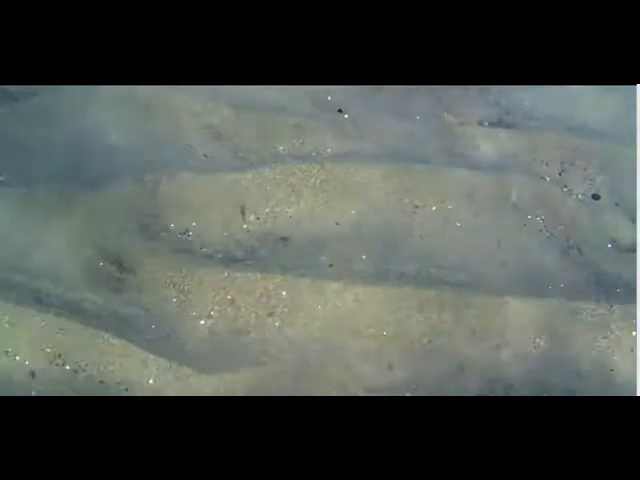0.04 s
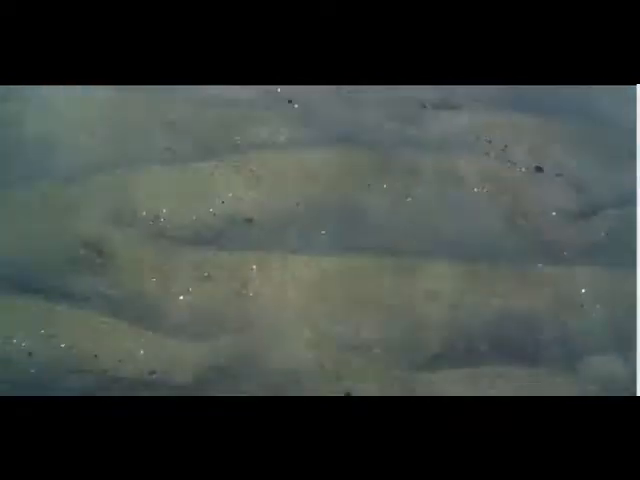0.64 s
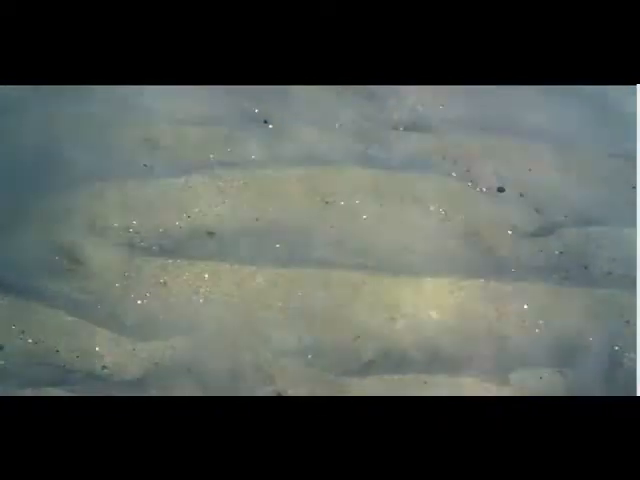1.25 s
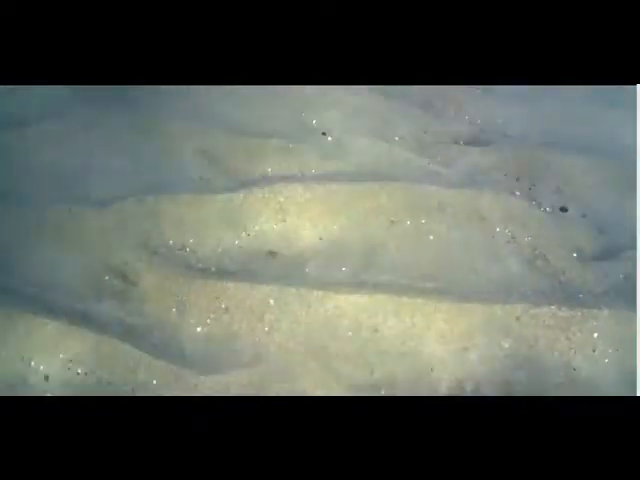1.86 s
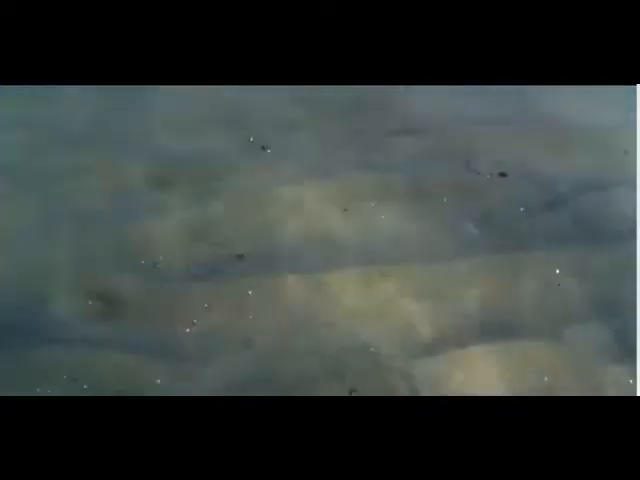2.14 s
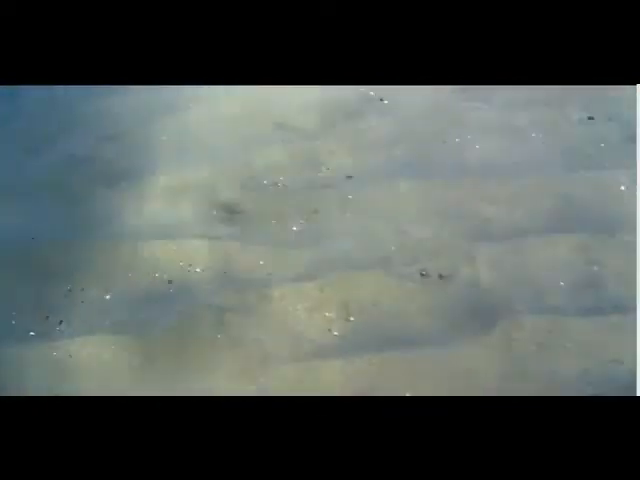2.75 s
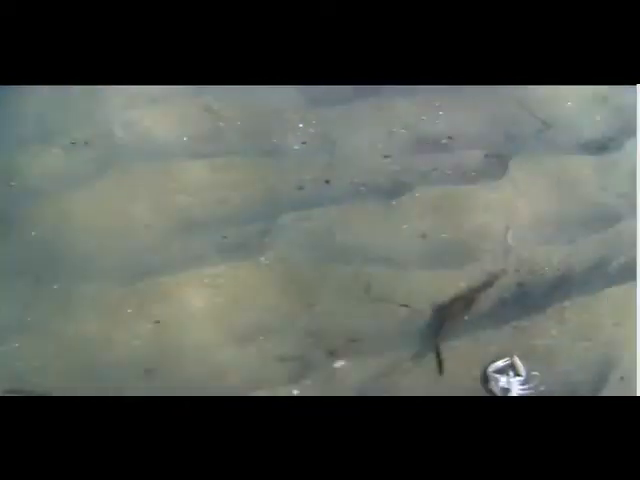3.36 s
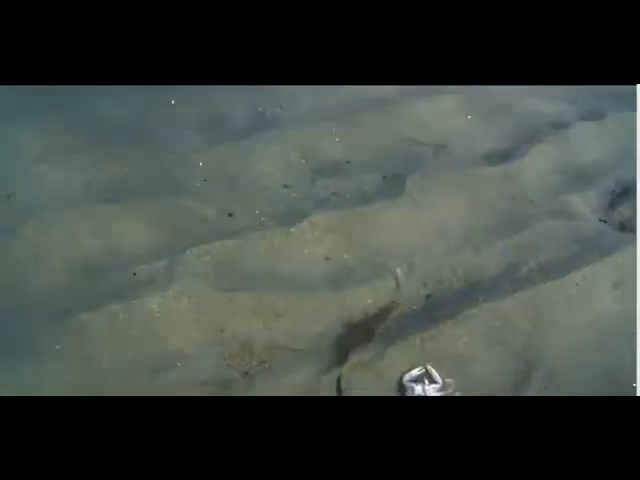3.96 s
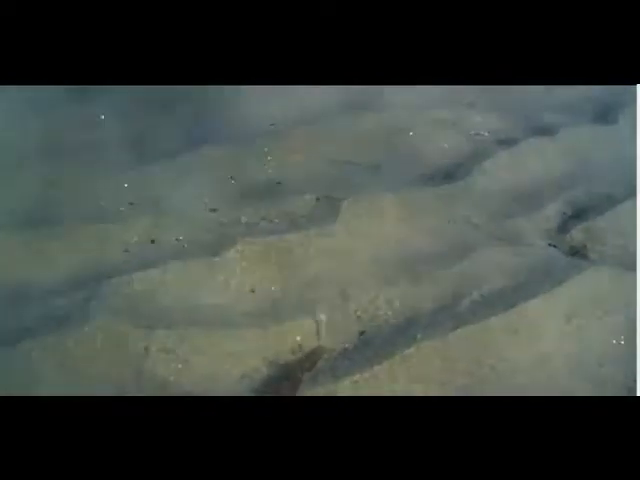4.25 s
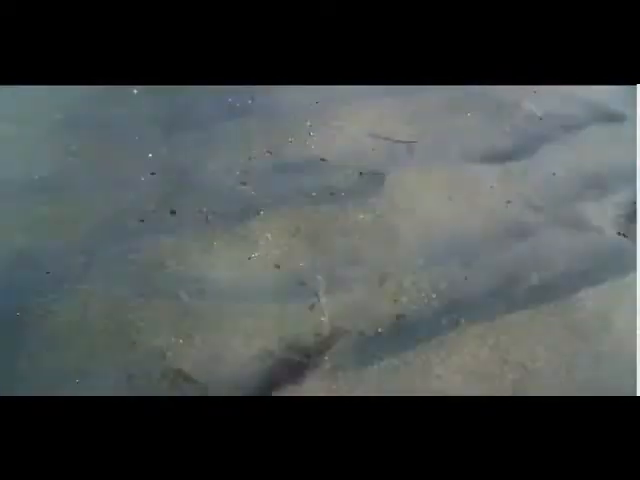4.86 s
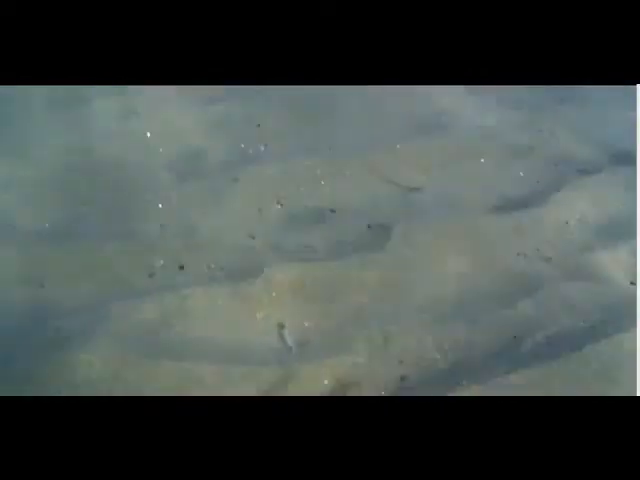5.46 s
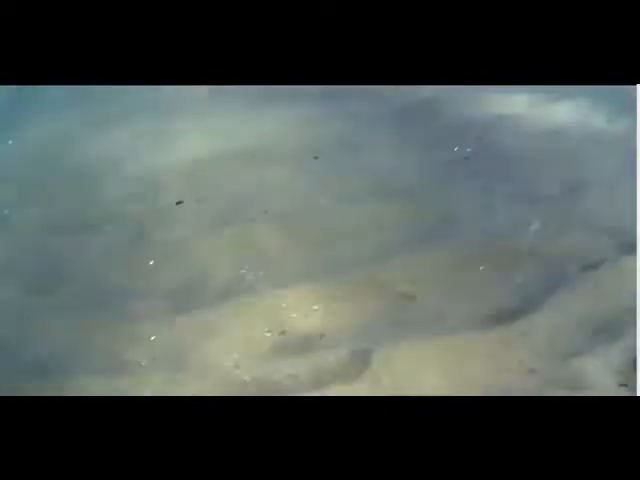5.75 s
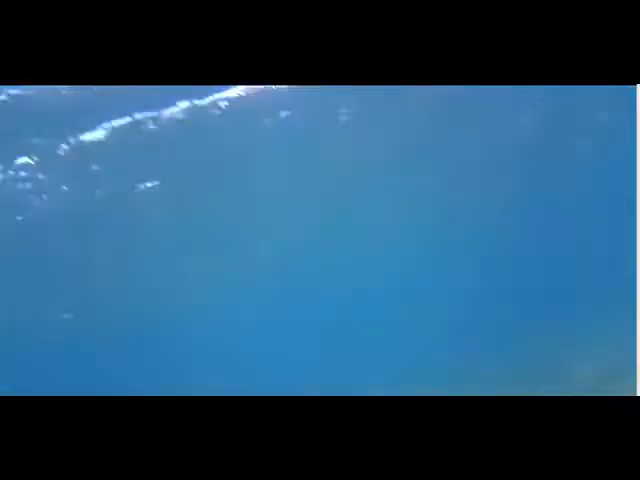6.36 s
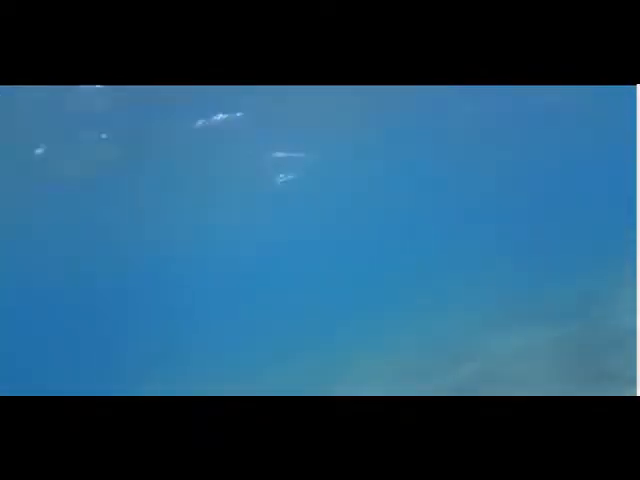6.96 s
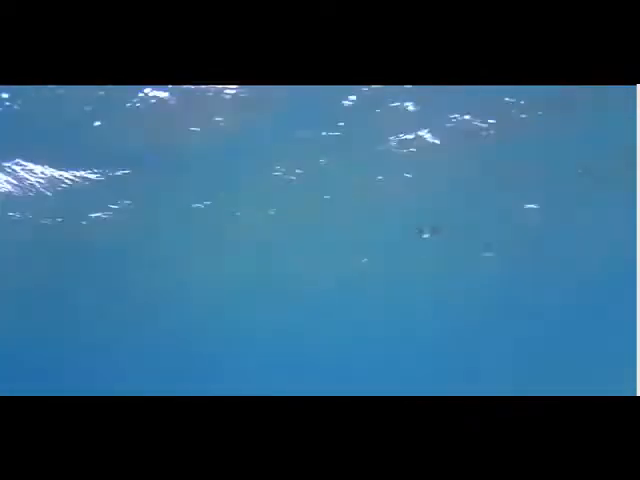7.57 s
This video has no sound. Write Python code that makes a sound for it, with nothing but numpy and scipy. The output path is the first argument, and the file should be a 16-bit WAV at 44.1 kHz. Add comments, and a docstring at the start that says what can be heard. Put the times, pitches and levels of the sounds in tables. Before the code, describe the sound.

A plastic camera case is handled underwater, giving short ringing clicks and scrapes over soft water movement, small bubbles and faint rumble.

```python
"""Knocks and finger slips on a plastic camera housing, handled under water over a shallow sandy bed.
Each contact rings the shell briefly at one strong pitch and thuds its damped wall.
Hand moves rub the shell and stir the water; a few bubbles ping.
A faint low throb, probably the camera's own works, runs underneath."""
import sys
import numpy as np
from scipy import signal
from scipy.fft import rfft, irfft, next_fast_len
from scipy.io import wavfile
from scipy.ndimage import uniform_filter1d, map_coordinates

SR = 44100
rng = np.random.default_rng(int(sys.argv[2]) if len(sys.argv) > 2 else 0)


def store_pcm(level_fs):
    """Save levels as 16-bit WAV."""
    pcm = np.round(np.clip(level_fs, -1, 1) * 32767).astype(np.int16)
    wavfile.write(sys.argv[1], SR, np.atleast_2d(pcm).T)


N = 336042
STILL_WATER_DB, STILL_GRIP_DB = -84, -82


def amp(db):
    """dB to gain."""
    return 10 ** (np.asarray(db) / 20)


def unit(x):
    """x at rms 1."""
    return x / np.sqrt(np.mean(x ** 2) + 1e-20)


def unit_peak(hits):
    """Each row at rms 1 over its loudest 3 ms."""
    power = uniform_filter1d(hits ** 2, size=132, axis=-1)
    return hits / np.sqrt(power.max(axis=-1, keepdims=True) + 1e-20)


def wobble(knots_per_s):
    """Smooth random curve."""
    knots = rng.standard_normal(int(N * knots_per_s / SR) + 4)
    return map_coordinates(knots, [np.arange(N) * knots_per_s / SR])


def filtered(x, response):
    """x through a complex frequency response."""
    n = x.shape[-1]
    size = next_fast_len(n + min(n, SR))
    return irfft(rfft(x, size) * response(np.fft.rfftfreq(size, 1 / SR)), size)[..., :n]


def coloured(x, spectrum):
    """x shaped by (frequency [Hz], level [dB]) points, at rms 1."""
    hz, db = np.transpose(spectrum)
    return unit(filtered(x, lambda f: amp(np.interp(np.log(f + 1), np.log(hz), db))))


def softened(force, corner_hz):
    """Soft contact: force spread in time, treble lost."""
    return filtered(force, lambda f: 1 / (1 + 1j * f / corner_hz))


def resonate(x, modes, skirt=0.11):
    """x through damped modes with steep skirts."""
    size = 8192
    f = np.fft.rfftfreq(size, 1 / SR) + 1
    power = 0
    for hz, width_hz, db in modes:
        peak = amp(2 * db) / (1 + (2 * (f - hz) / width_hz) ** 2)
        skirt_hz = width_hz + skirt * np.sqrt(hz * 2000)
        power += peak / (1 + ((f - hz) / skirt_hz) ** 4)
    # minimum phase: the ring follows the blow
    cepstrum = irfft(np.log(power + 1e-8) / 2)
    cepstrum[1:size // 2] *= 2
    cepstrum[size // 2 + 1:] = 0
    ring = irfft(np.exp(rfft(cepstrum)))[:size // 4]
    rung = signal.fftconvolve(np.atleast_2d(x), ring[None], axes=1)
    return rung[:, :x.shape[-1]].reshape(x.shape)


# hand moves: (time [s], 20 dB fade time [s], water level [dB], grip level [dB])
HAND_MOVES = [(.33, .25, -79, -82), (.72, .5, -96, -75), (2.16, 1.0, -71.5, -65.5), (2.6, 0.65, -70.5, -60),
              (3.5, 0.43, -72, -57), (4.33, 0.74, -70, -60.5), (5.76, 0.93, -65, -60.5),
              (6.14, 0.4, -63.5, -46), (6.45, 0.32, -56, -37.5), (6.64, .21, -55.5, -41),
              (7.0, 2, -75, -60.5)]


def stirring(peaks_db, rest_db, onset_db_per_s=230):
    """Level in dB per sample: each move builds fast, then fades to rest."""
    t = np.arange(N) / SR
    power = amp(2 * rest_db)
    for (s, fade_s, *_), db in zip(HAND_MOVES, peaks_db):
        fall_db = np.maximum(onset_db_per_s * (s - t), 20 * (t - s) / fade_s)
        power = power + amp(2 * (db - fall_db))
    return 10 * np.log10(power)


# throb pulse spectrum: (frequency [Hz], relative density [dB])
PULSE_SPECTRUM = [(10, -21.5), (24, -2.5), (48, -3), (72, -11), (105, -13), (150, -22.5), (300, -39.5),
                  (800, -90.5)]
# rumble spectrum: (frequency [Hz], relative density [dB])
RUMBLE_SPECTRUM = [(12, -15.5), (35, -2), (70, -1.5), (108, 2.5), (150, -9.5), (240, -10.5), (320, -31.5),
                   (600, -43), (1500, -84)]


def throb(flow_db, rate_hz=24, jitter_s=0.0034, surge_db=3.5, drift_db=1,
          base_db=-62.5, pulse_db=-1, rumble_db=-3, max_swell_db=5, knee_db=10):
    """Soft, even pulses in a rumble that surges with each; both swell as the housing moves."""
    beats_s = np.arange(0, N / SR, 1 / rate_hz)
    beats_s += jitter_s * rng.standard_normal(len(beats_s))
    pulses = np.bincount(np.clip(beats_s * SR, 0, N - 1).astype(int), minlength=N)
    beat = amp(pulse_db) * coloured(pulses.mean() - pulses, PULSE_SPECTRUM)
    cycle = np.cos(2 * np.pi * rate_hz * np.arange(N) / SR)
    rumble_gain = amp(rumble_db + surge_db * cycle + drift_db * wobble(3.7))
    rumble = rumble_gain * coloured(rng.standard_normal(N), RUMBLE_SPECTRUM)
    swell_db = max_swell_db * np.tanh((flow_db - STILL_WATER_DB) / knee_db)
    return (beat + rumble) * amp(base_db + swell_db)


# swirl spectrum: (frequency [Hz], relative density [dB])
WATER_SPECTRUM = [(100, -21), (250, -0.5), (480, 5), (700, -4), (900, -13.5), (1200, -3.5), (1700, -14.5),
                  (2400, -2.5), (3000, -10.5), (3800, -28), (6000, -30), (10000, -36), (11500, -61.5)]


def water(flow_db, patchy_db=3.0, trim_db=1):
    """Dull swirl around the moving housing, patchy in pitch and time."""
    noise = signal.stft(rng.standard_normal(N), nperseg=512)[2]
    patches = uniform_filter1d(rng.standard_normal(noise.shape), size=4, axis=0)
    patches = uniform_filter1d(patches, size=6, axis=1)
    swirl = signal.istft(noise * amp(patchy_db * unit(patches)), nperseg=512)[1][:N]
    return coloured(swirl, WATER_SPECTRUM) * amp(flow_db + trim_db)


# main shell modes, strongest last: (frequency [Hz], width [Hz], relative level [dB])
MAIN_MODES = [(1640, 140, -14), (1778, 130, 0)]
# weaker shell modes: (frequency [Hz], width [Hz], relative level [dB])
WEAK_MODES = [(1124, 52, -20.5), (2230, 120, -30.5), (2360, 160, -22), (3120, 340, -42.5), (4590, 630, -52),
              (5658, 100, -23.5), (6082, 180, -32.5), (7030, 730, -46.5), (8660, 1000, -49),
              (9630, 140, -27), (9994, 130, -33)]


def shell(force):
    """Brief ring of the plastic shell under a force."""
    return resonate(force, MAIN_MODES + WEAK_MODES)


def friction(slips_per_s, drag, spread_db=3.5):
    """Force at rms 1: tiny uneven slips over a steady noisy drag."""
    slips = (rng.random(N) < slips_per_s / SR) * amp(spread_db * rng.standard_normal(N))
    return unit(unit(slips) + drag * rng.standard_normal(N))


def rubbing(grip_db, flutter_db=3.8, trim_db=-3.2, soft_hz=2600):
    """Soft skin creeps over the shell."""
    creep = softened(friction(slips_per_s=300, drag=0.6), soft_hz)
    return unit(shell(creep)) * amp(grip_db + trim_db + flutter_db * wobble(38))


def grip_crackle(grip_db, ticks_per_s=24, spread_db=3.0, cluster_db=2.5, trim_db=-5, soft_hz=6000):
    """The shifting grip ticks on the shell in faint clusters, as strong as the hand's movement."""
    ticks = rng.random(N) < ticks_per_s / SR
    tick_db = spread_db * np.clip(rng.standard_normal(N), -2, 2) + cluster_db * wobble(7)
    force = softened(ticks * amp(tick_db), soft_hz)
    return unit(shell(force)) * amp(grip_db + trim_db)


def fizz(flow_db, count=260, centre_hz=1600, decay_cycles=16, spread_db=4):
    """Tiny bubbles of mixed sizes ping, louder in stirred water."""
    track, t = np.zeros(N), np.arange(SR // 20) / SR
    times_s = rng.random(count) * N / SR
    scatter = np.clip(rng.standard_normal((count, 2)), -2, 2)
    for s, (pitch, strength) in zip(times_s, scatter):
        hz = centre_hz * 2 ** (pitch / 2)
        db = flow_db[int(s * SR)] + spread_db * strength
        envelope = np.exp(-hz * t / decay_cycles) * (1 - np.exp(-hz * t))
        add(track, s, amp(db) * envelope * np.sin(2 * np.pi * hz * t))
    return track


def add(track, s, sound):
    """Mix sound into track at s seconds."""
    part = track[max(round(s * SR), 0):][:len(sound)]
    part += sound[:len(part)]


# low wall modes: (frequency [Hz], width [Hz], relative level [dB])
WALL_MODES = [(148, 60, -9), (241, 96, -0.5), (432, 70, 1.5), (498, 130, 2.5), (670, 100, -21.5),
              (870, 350, -6)]


def wall(force):
    """Damped thud of the housing wall under a force."""
    return resonate(force, WALL_MODES)


def knock_force(hardness_db, chatter=0.095, chatter_s=0.0021, settle=0.014, settle_s=0.012,
                bounces=4, rebound=0.75, soft_hz=4000):
    """One row per contact: snap, chatter and rebounds; harder blows are brighter and rebound more."""
    count, t = len(hardness_db), np.arange(SR // 16) / SR
    envelope = chatter * np.exp(-t / chatter_s) + settle * np.exp(-t / settle_s)
    force = rng.standard_normal((count, len(t))) * envelope
    force[:, 0] += 1
    # the main mode throws the contact off and catches it 1-3 cycles later
    shape = (count, bounces)
    cycles = np.cumsum(rng.integers(1, 4, shape), axis=1) + 0.07 * rng.standard_normal(shape)
    landings = np.round(cycles / MAIN_MODES[-1][0] * SR).astype(int)
    retained = np.clip(0.58 + 0.009 * hardness_db, 0, 1) ** np.arange(bounces)
    force[np.arange(count)[:, None], landings] += rebound * retained * rng.uniform(0.28, 1, shape)
    return softened(force, soft_hz * amp(0.24 * hardness_db))


# finger knocks: (time [s], ring level [dB])
FINGER_KNOCKS = [(0.218, -64), (0.33, -59), (0.352, -61), (0.4745, -54), (2.0852, -17), (2.1075, -24),
                 (2.1125, -23), (2.2065, -25), (2.269, -35), (2.46, -31), (2.4915, -38), (2.51, -32),
                 (2.5452, -15), (2.62, -46), (2.7195, -38), (3.3425, -35), (3.348, -33), (3.3795, -41),
                 (3.4688, -40), (3.546, -41), (3.643, -44), (4.2092, -12), (4.2235, -30), (4.261, -31),
                 (4.2912, -29), (4.823, -56), (5.59, -62), (5.655, -70), (5.7105, -52), (5.7553, -13),
                 (5.7612, -17), (5.806, -38), (5.833, -37), (5.856, -25), (6.0333, -8.5), (6.049, -23),
                 (6.0695, -25), (6.1545, -24), (6.168, -24), (6.2102, -15), (6.2448, -33), (6.3147, -44),
                 (6.3655, -34), (6.4277, -17), (6.4325, -17), (6.4414, -11), (6.446, -13), (6.4575, -13),
                 (6.479, -22), (6.51, -31), (6.5655, -32), (6.5863, -26), (6.6072, -26), (6.622, -24),
                 (6.6822, -19), (6.6895, -9), (6.7035, -25), (6.773, -33), (6.848, -39), (6.885, -47),
                 (7.032, -50), (7.183, -57), (7.284, -51), (7.3, -40), (7.461, -48)]


def knocks(thud_db=-27, thud_db_per_db=0.75, finger_pad_db=-62):
    """Each knock rings the shell and thuds the wall; the gentlest are mostly thud."""
    strength_db = np.array(FINGER_KNOCKS)[:, 1:2]
    force = knock_force(strength_db - strength_db.mean())
    rings, thuds = unit_peak(shell(force)), unit_peak(wall(force))
    track = np.zeros(N)
    for (s, db), ring, thud in zip(FINGER_KNOCKS, rings, thuds):
        thud_gain = np.hypot(amp(thud_db + thud_db_per_db * db), amp(finger_pad_db))
        add(track, s, amp(db) * ring + thud_gain * thud)
    return track


# larger bubbles: (time [s], start pitch [Hz], nominal level [dB], 60 dB decay time [s])
LARGE_BUBBLES = [(.328, 732, -68, 0.15), (1.135, 547, -62.5, 0.055), (2.811, 1460, -46, 0.06),
                 (3.477, 1156, -51, 0.091), (3.521, 680, -53.5, 0.16), (3.886, 1546, -51.5, 0.038),
                 (4.132, 1860, -46.5, 0.042), (4.406, 3090, -62, 0.036), (4.881, 438, -53.5, 0.062),
                 (5.348, 1280, -64, .07), (5.702, 442, -51, 0.076), (6.918, 708, -46, 0.14),
                 (6.924, 1745, -40.5, 0.073), (6.968, 1270, -48, 0.034), (7, 2380, -46, 0.04),
                 (7.111, 1785, -42.5, 0.067), (7.371, 1120, -50, 0.08)]


def bubbles(rise_per_t60=0.07, attack_s=0.00041, flutter_db=4, pinch_db=2, pinch_s=0.0022):
    """Pinch-off ticks the shell; the bubble then rings, pitch creeping up, level shaking."""
    pings, ticks, t = np.zeros(N), np.zeros(N), np.arange(SR // 5) / SR
    for s, hz, db, t60 in LARGE_BUBBLES:
        phase = 2 * np.pi * hz * (t + rise_per_t60 * t * t / (2 * t60))
        envelope = np.exp(-np.log(1000) * t / t60) * (1 - np.exp(-t / attack_s))
        add(pings, s, amp(db) * envelope * np.sin(phase))
        add(ticks, s, amp(db + pinch_db) * rng.standard_normal(len(t)) * np.exp(-t / pinch_s))
    return pings * amp(flutter_db * wobble(250)) + shell(ticks)


# finger slides: (centre time [s], length [s], level before trim [dB], wall re shell [dB])
FINGER_SCRAPES = [(0.75, 0.082, -65, -27), (0.89, 0.067, -67, -23), (1.569, 0.04, -67, -22),
                  (2.199, 0.025, -48, -14), (2.497, 0.094, -45.5, -5), (2.717, 0.026, -45, -17.5),
                  (2.827, 0.041, -48, -24), (3.474, 0.053, -44.5, -31), (3.578, 0.063, -48, -17),
                  (4.208, 0.013, -26.5, -24.5), (4.281, 0.025, -45.5, -18), (4.528, 0.045, -56.5, -13),
                  (5.967, 0.03, -43.5, -20), (6.058, 0.037, -29, -17), (6.166, 0.069, -31.5, -18),
                  (6.25, 0.017, -39, -19), (6.375, 0.032, -39.5, -20), (6.442, 0.062, -22.5, -16),
                  (6.495, 0.033, -31.5, -16.5), (6.7, 0.076, -25.5, -20), (7.311, 0.021, -44, -15)]


def scrapes(trim_db=-1, soft_hz=6000, flutter_db=2.0):
    """A finger slides with uneven grip: dense slips swell and fade, shaking shell and wall."""
    shell_gain, wall_gain = np.zeros(N), np.zeros(N)
    for s, length_s, db, wall_db in FINGER_SCRAPES:
        pressure = amp(db + trim_db) * np.sqrt(np.hanning(round(length_s * SR)))
        add(shell_gain, s - length_s / 2, pressure)
        add(wall_gain, s - length_s / 2, amp(wall_db) * pressure)
    slips = friction(slips_per_s=990, drag=0.27) * amp(flutter_db * wobble(230))
    force = softened(slips, soft_hz)
    return shell_gain * unit(shell(force)) + wall_gain * unit(wall(force))


def scene(hiss_db=-99):
    """One microphone inside the housing, with its own faint hiss."""
    _, _, flow_peaks_db, grip_peaks_db = np.transpose(HAND_MOVES)
    flow_db = stirring(flow_peaks_db, STILL_WATER_DB)
    grip_db = stirring(grip_peaks_db, STILL_GRIP_DB)
    handling = knocks() + scrapes() + rubbing(grip_db) + grip_crackle(grip_db)
    sea = water(flow_db) + bubbles() + fizz(flow_db)
    return (handling + sea + throb(flow_db) + amp(hiss_db) * rng.standard_normal(N))[None]


def record(dry, top_hz=10450):
    """The camera's band limit: a steep low-pass."""
    return filtered(dry, lambda f: 1 / np.sqrt(1 + (f / top_hz) ** 80))


dry = scene()
out = record(dry)
store_pcm(out)
```